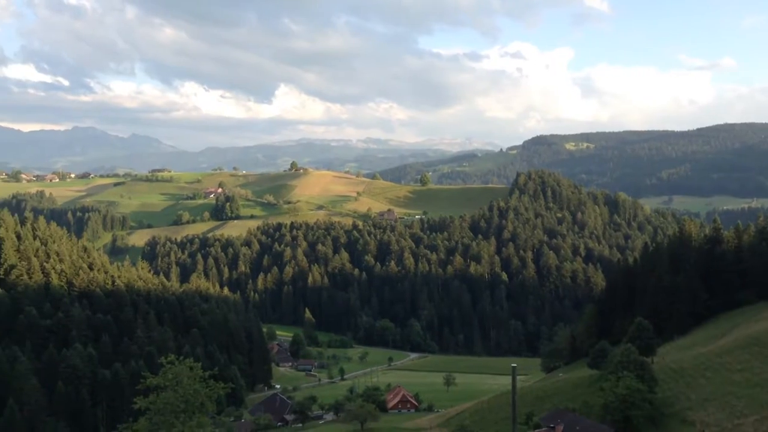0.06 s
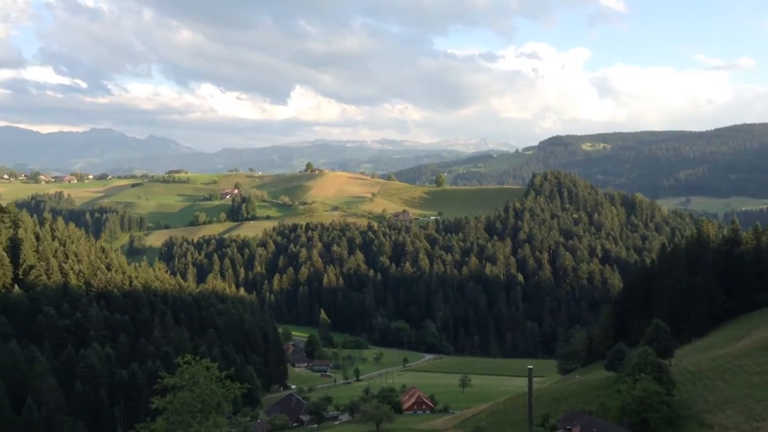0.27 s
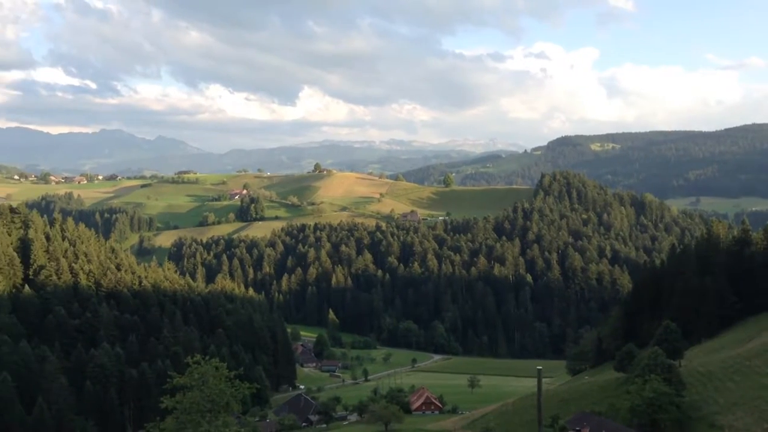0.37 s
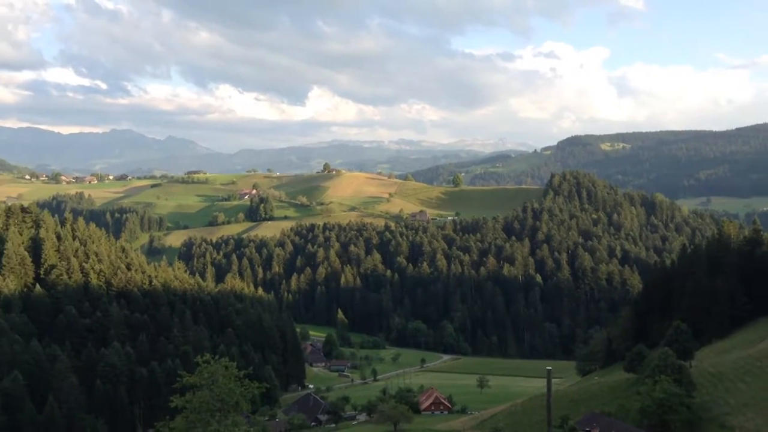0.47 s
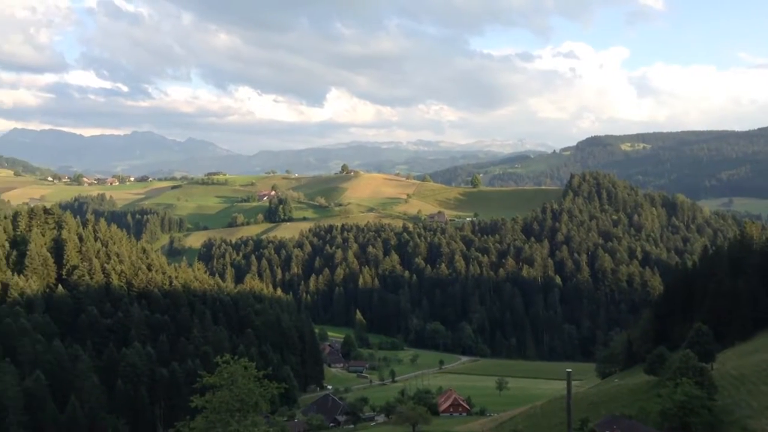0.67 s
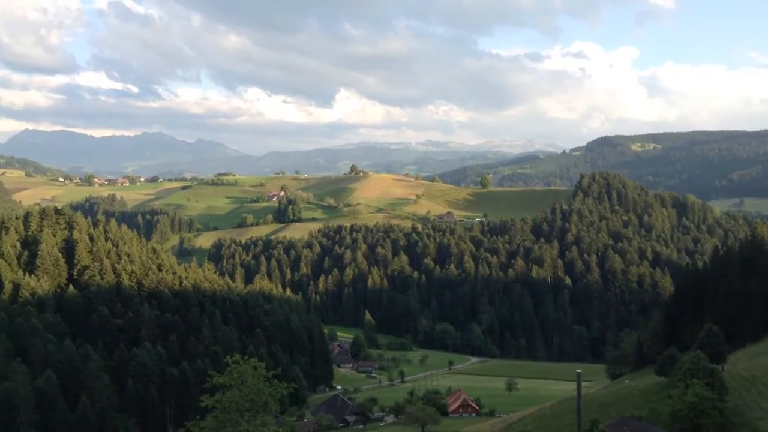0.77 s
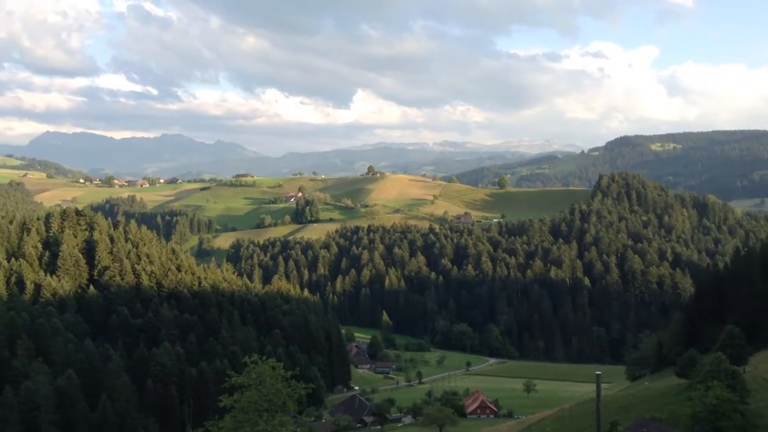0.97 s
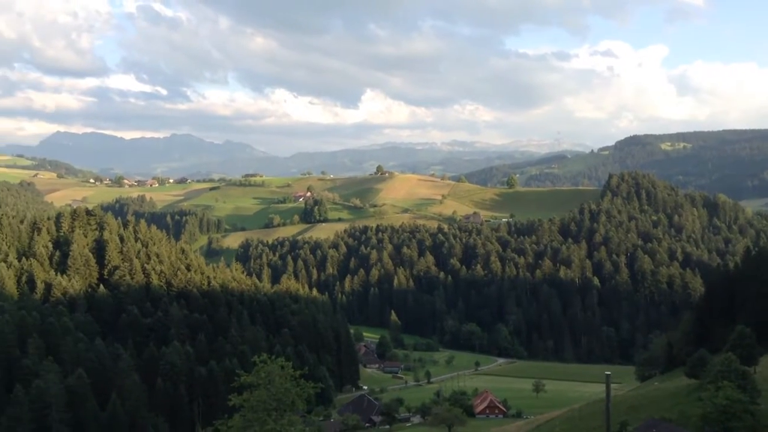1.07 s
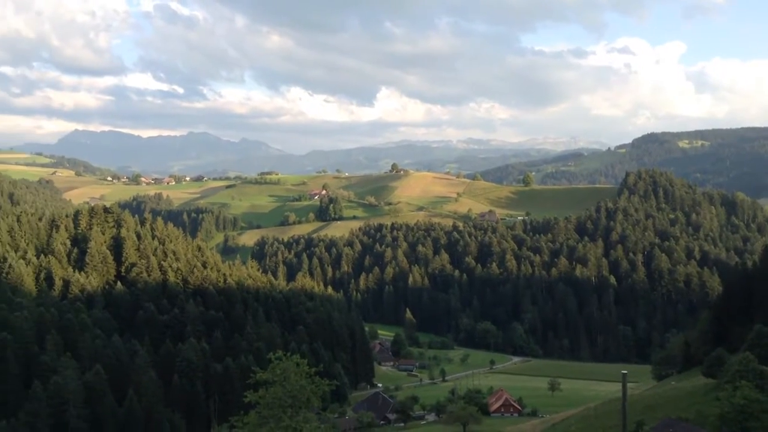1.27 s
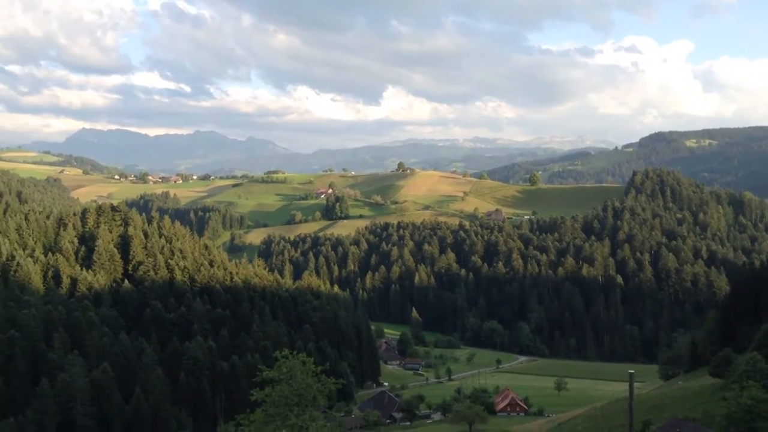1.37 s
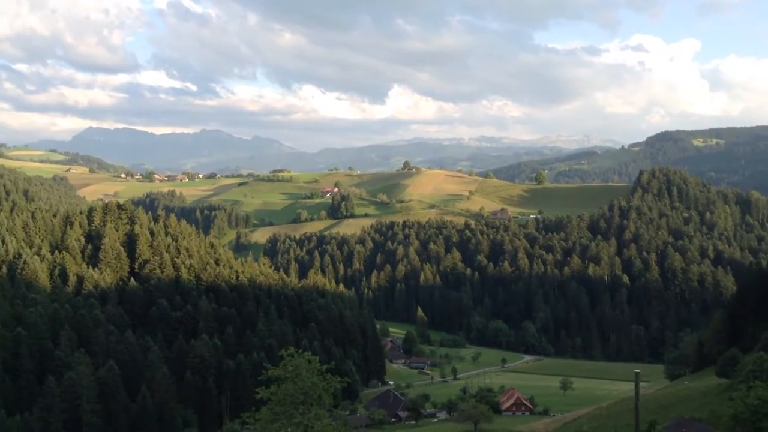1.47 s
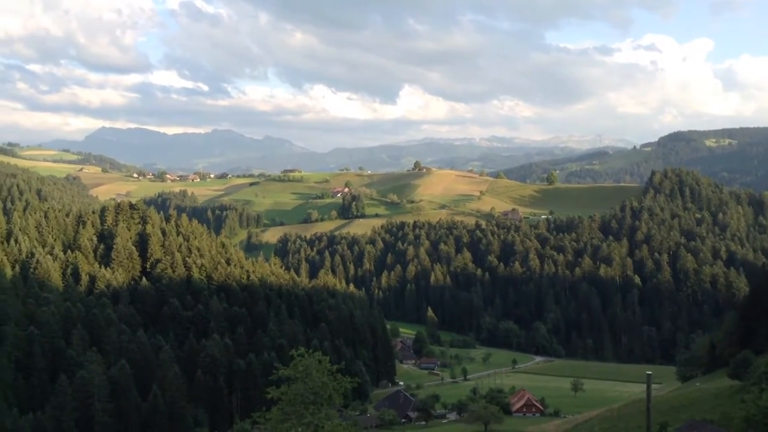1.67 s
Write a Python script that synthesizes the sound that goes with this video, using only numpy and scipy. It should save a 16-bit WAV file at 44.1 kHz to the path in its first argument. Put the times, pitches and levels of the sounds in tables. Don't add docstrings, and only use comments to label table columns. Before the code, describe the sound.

A cow grunts softly at 0.13 s, then lows from 0.23 to 1.2 s: a rough start, rising in pitch, loudest near 0.63, easing, then cracking at 1.14, with faint hillside echo. A small nearby bell clinks at 0.19, 0.55, 0.75 and hardest at 0.92; a farther bell at 1.22. Crickets and faint wind continue throughout; a thin bird whistle falls before 0.5; a dove coos from 1.64.

```python
import sys
import numpy as np
from scipy import signal
from scipy.io import wavfile
from scipy.ndimage import uniform_filter1d

SR = 44100
rng = np.random.default_rng(int(sys.argv[2]) if len(sys.argv) > 2 else 0)


def decibels_to_gain(level_db):
    exponent = np.asarray(level_db, float) / 20
    return 10 ** exponent


def put_to_file(sound):
    columns = np.atleast_2d(sound).T
    safe = np.clip(columns, -1, 1)
    whole_steps = np.round(safe * 32767)
    wavfile.write(sys.argv[1], SR, whole_steps.astype(np.int16))


N = 74970
BREAK_S = 1.14


def evened(x):
    return x / np.sqrt(np.mean(x ** 2) + 1e-20)


def curve(table, t, axis=1):
    rows = np.array(table, float)
    return np.interp(t, rows[:, 0], rows[:, axis])


def resonate(x, hz, width_hz):
    turn = np.exp(2j * np.pi * np.cumsum(hz * np.ones(len(x))) / SR)
    r = np.exp(-np.pi * width_hz / SR)
    return 2 * (turn * signal.lfilter([1 - r], [1, -r], x / turn)).real


def drift(size):
    return evened(uniform_filter1d(uniform_filter1d(rng.standard_normal(N), size), size))


def fade(t, start, end, edge):
    return np.clip(np.minimum(t - start, end - t) / edge, 0, 1)


def air():
    # f/Hz, level/dB per Hz
    colour = [(40, -71), (100, -19), (180, -4), (1200, -2.5), (3000, -7.5), (5300, -13), (7000, -19),
              (15000, -23)]
    level_db, patch_db = -67, 1.5
    frames, hz = N // 256 + 5, np.fft.rfftfreq(1024, 1 / SR)
    a, b, patches = rng.standard_normal((frames, 513, 3)).T
    patches = evened(uniform_filter1d(uniform_filter1d(patches, 12, 0), 12, 1))
    f, db = np.transpose(colour)
    colour_db = np.interp(np.log(hz + 1), np.log(f), db)[:, None]
    z = (a + 1j * b) * decibels_to_gain(colour_db + patch_db * patches)
    return decibels_to_gain(level_db) * evened(signal.istft(z, nperseg=1024, noverlap=768)[1][:N])


def chirps(rows):
    every_s, stroke_s, sag_hz = 0.032, 0.024, 141
    out = np.zeros(N)
    for s, length, hz, db, stray in rows:
        chance = stray * rng.standard_normal((6, 3))
        for k in range(int(length / every_s) + 1):
            i = round((s + k * every_s - stroke_s / 2) * SR)
            u = np.arange(max(i, 0), min(i + round(stroke_s * SR), N))
            x = (u - i) / SR / stroke_s
            turns = stroke_s * ((hz + 25 * chance[k, 0]) * x + sag_hz * (x - x ** 2) / 2)
            level = decibels_to_gain(db + 3.1 * chance[k, 1]) * np.sqrt(2) * np.sin(np.pi * x) ** 0.84
            out[u] += level * np.sin(2 * np.pi * turns + 30 * chance[k, 2])
    return out


def far_crickets():
    count, chorus_hz, spread_hz, chorus_db = 70, 4484, 192, -73
    haze_db, haze_width_hz = -66.5, 950
    rows = []
    for start, (stray_hz, stray_db) in zip(rng.random(count), rng.standard_normal((count, 2))):
        hz = chorus_hz + spread_hz * np.clip(stray_hz, -2, 2)
        rows.append((2.0 * start - .1, .12, hz, chorus_db + 3 * stray_db, 1))
    haze = rng.standard_normal(N)
    for _ in range(4):
        haze = resonate(haze, chorus_hz, haze_width_hz)
    return chirps(rows) + decibels_to_gain(haze_db) * evened(haze)


def near_crickets():
    # t/s, f/Hz, level/dB
    strokes = [(0.01, 4520, -63.5), (0.039, 4540, -62), (0.076, 4600, -60), (0.117, 4590, -61),
               (0.145, 4370, -68), (0.151, 4727, -63), (0.17, 4750, -69), (0.186, 4770, -62),
               (0.19, 4650, -68), (0.208, 4480, -64.6), (0.226, 4600, -64), (0.228, 4820, -62.5),
               (0.254, 4554, -60.5), (0.274, 4540, -69), (0.291, 4560, -65.7), (0.401, 4610, -62),
               (0.436, 4620, -61.9), (0.473, 4580, -61.9), (0.498, 4380, -62), (0.513, 4820, -63.5),
               (0.577, 4770, -62), (0.588, 4511, -64), (0.604, 4590, -69), (0.62, 4720, -61.5),
               (0.703, 4447, -67.5), (0.772, 4460, -65.2), (0.778, 4700, -69), (0.801, 4610, -62.6),
               (0.808, 4425, -68), (0.819, 4597, -68), (0.841, 4530, -64), (0.843, 4380, -67.0),
               (0.876, 4609, -61), (0.927, 4420, -63), (0.959, 4500, -62), (0.968, 4360, -66.5),
               (0.992, 4774, -66.5), (1.006, 4390, -62), (1.022, 4776, -64), (1.067, 4797, -67),
               (1.173, 4510, -67), (1.2, 4660, -63), (1.218, 4430, -67), (1.238, 4570, -60),
               (1.248, 4360, -76), (1.276, 4640, -62), (1.276, 4468, -65.3), (1.316, 4600, -62.5),
               (1.442, 4750, -66.6), (1.484, 4780, -66.4), (1.53, 4580, -63), (1.565, 4650, -59.5),
               (1.6, 4576, -59.5), (1.612, 4380, -61), (1.618, 4791, -63), (1.632, 4350, -69),
               (1.639, 4570, -63.5), (1.692, 4490, -70)]
    gain_db = 5
    return chirps([(s, 0, hz, db + gain_db, .1) for s, hz, db in strokes])


def birdcall(track, flutter_db):
    t = np.arange(N) / SR
    level = decibels_to_gain(curve(track, t, axis=2) + flutter_db * drift(200))
    level = level * fade(t, track[0][0], track[-1][0] + 0.0093, 0.02)
    return np.sqrt(2) * level * np.sin(2 * np.pi * np.cumsum(curve(track, t)) / SR)


def dove():
    # t/s, f/Hz, level/dB
    coo = [
        (1.635, 490, -76),
        (1.66, 517, -78),
        (1.68, 547, -61),
        (1.7, 584, -56),
    ]
    return birdcall(coo, flutter_db=.5)


def whistle():
    # t/s, f/Hz, level/dB
    fall = [
        (.05, 8420, -95),
        (.174, 7870, -84),
        (.25, 7820, -76),
        (.32, 7720, -85),
        (.38, 7720, -76.5),
        (.48, 7650, -87),
    ]
    return birdcall(fall, flutter_db=1.5)


def bell(tones_hz, modes, blows, facing, swing_db):
    swing_hz, facing_db, clapper_s = 3.8, 5, .002
    t, out = np.arange(N) / SR, np.zeros(N)
    for k, (hz, (db, t60, side, lobes)) in enumerate(zip(tones_hz, modes)):
        power = np.zeros(N)
        for s, blow_db, at, hard, ring in blows:
            decay_db = 60 * np.maximum(t - s, 0) / (t60 * ring)
            struck = decibels_to_gain(db + blow_db + hard * np.log2(hz / 6000) - decay_db)
            power += (struck * np.cos(lobes * (at - side)) * np.clip((t - s) / clapper_s, 0, 1)) ** 2
        swing = swing_db * np.sin(2 * np.pi * (swing_hz * t + rng.random()))
        waver = decibels_to_gain(swing + facing_db * curve(facing, t) * np.cos(2 * side))
        out += np.sqrt(2 * power) * waver * np.sin(2 * np.pi * (hz * (t - blows[-1][0]) + k / 2))
    return out


def far_bell():
    tones_hz = [2304, 5444, 9222, 9658, 13910]
    # level/dB, t60/s, loudest strike side/rad, lobes round the rim
    modes = [(-70, 2.5, 0.76, 1), (-67.5, 2.45, 0.1, 1), (-82.5, 0.82, 0, 1), (-107, 0.27, 0, 1),
             (-79, 0.21, 0, 1)]
    # t/s, level/dB, side/rad, hardness/dB per octave, ring share
    blows = [
        (1.217, 0, 0.012, 0.00025, 1),
    ]
    # t/s, facing [about -1 to 1]
    facing = [(1.217, -0.26), (1.24, 0.37), (1.302, 0.67), (1.38, -1.3), (1.5, -0.41), (1.55, 0.34),
              (1.636, -0.84), (1.66, 1), (1.7, 0)]
    return bell(tones_hz, modes, blows, facing, swing_db=-1.5)


def near_bell():
    tones_hz = [3827, 3861.6, 6565, 6616, 7289, 7312, 8312, 9806, 9846, 10060, 10116, 13768]
    # level/dB, t60/s, loudest strike side/rad, lobes round the rim
    modes = [(-55.5, 3.05, 0.034, 1.03), (-57.5, 5.7, 1.74, 1.05), (-58.5, 1.15, 0.13, 1.19),
             (-68, 0.79, 2.7, 0.77), (-73.5, 0.65, .05, 1), (-62.5, 0.74, 0.7, 2), (-66, 0.39, 0.55, 2.25),
             (-82, 1.2, 0.74, 1.8), (-73, 0.27, 0.17, 2.2), (-89, 0.23, 2, 1.05), (-76.5, 0.67, 0.29, 1.25),
             (-72, .33, 0.55, 3.4)]
    # t/s, level/dB, side/rad, hardness/dB per octave, ring share
    blows = [
        (0.188, 1, 1.25, 3.5, 1.1),
        (0.551, -5.5, 0.033, 3, 1.5),
        (0.753, 1.5, 0.21, 5.5, 1.23),
        (0.921, 6, 1.105, 8, 0.7),
    ]
    # t/s, facing [-1 to 1]
    facing = [(.2, 0.65), (.58, 1), (.68, -0.67), (0.899, -.2), (1.05, 0.75), (1.2, -0.083), (1.4, -0.14),
              (1.549, 0.38), (1.7, 0.85)]
    return bell(tones_hz, modes, blows, facing, swing_db=2.5)


def grunt(t):
    start_s, length_s, tone_hz, tone_db, rasp_db = 0.132, 0.085, 196.7, -61, -61.5
    puff = np.sin(np.pi * np.clip((t - start_s) / length_s, 0, 1))
    late = np.sin(np.pi * np.clip((t - start_s - .025) / length_s, 0, 1))
    high = resonate(resonate(rng.standard_normal(N), 2140, 280), 2200, 350)
    low = resonate(resonate(rng.standard_normal(N), 1260, 700), 1200, 700)
    rasp = evened(high + 0.81 * low)
    return decibels_to_gain(tone_db) * puff * np.sin(2 * np.pi * tone_hz * t) + decibels_to_gain(rasp_db) * late * rasp


def nose_hum(t, turns):
    # t/s, first partial level/dB, second partial level/dB
    levels = [(.13, -102, -100), (.2, -72, -62), (.28, -86, -64.5), (.42, -71, -69.5), (.52, -67, -71),
              (.87, -65, -80.5), (1.13, -63.5, -69), (1.19, -91, -69), (1.26, -78.5, -87)]
    drift_db, mic_low_hz = 2.2, 115
    hum = np.zeros(N)
    for k in (1, 2):
        hum += decibels_to_gain(curve(levels, t, axis=k) + drift_db * drift(700)) * np.sin(2 * np.pi * k * turns)
    hum = signal.sosfilt(signal.butter(4, mic_low_hz, "high", fs=SR, output="sos"), hum)
    return np.sqrt(2) * hum * fade(t, levels[0][0], levels[-1][0], 0.012)


def voice_catches(t):
    # t/s, length/s, level/dB, pitch sag [share]
    catches = [(0.276, 0.011, 2.5, -0.026), (0.303, .014, -2, 0.14), (0.39, 0.012, -1, 0.075),
               (.406, 0.0067, 2, -0.011), (0.418, 0.0086, 1, 0.037), (0.454, 0.0061, -2, 0.036),
               (0.49, 0.0084, -2.5, 0.043), (0.521, 0.00744, -2.5, 0.0432), (0.571, 0.0097, -0.5, 0.021),
               (0.589, 0.0075, -2, 0.0255), (0.733, .03, 0.34, 0.006), (0.834, .011, 1, 0.051),
               (0.855, .012, -2.5, 0.0031), (0.931, 0.01, -2.5, 0.013), (0.958, 0.013, 0.5, 0.016),
               (1.001, 0.0099, 0.5, 0.031), (1.022, 0.0093, -2, -0.0058), (1.045, 0.0059, 2.5, .025),
               (1.062, 0.0076, 1.5, 0.034), (1.085, 0.013, -3.5, -0.004), (1.159, .011, -7.5, 0.14)]
    dip_db, sag = np.zeros(N), np.zeros(N)
    for s, length, db, share in catches:
        bump = np.exp(-((t - s) / length) ** 2)
        dip_db += bump * db
        sag += bump * share
    return dip_db, sag


def fold_turns(t, sag, rough):
    # t/s, f/Hz
    pitch = [
        (.24, 119.5),
        (.33, 125.3),
        (.41, 137.1),
        (.54, 146.8),
        (.63, 155.8),
        (.9, 154),
        (1.14, 151.3),
        (1.19, 134.1),
        (1.25, 119.2),
    ]
    jitter, wobble, first_pulse_s = .022, .003, .2503
    stray = jitter * rough / .6 * drift(70) + wobble * drift(600)
    turns = np.cumsum(curve(pitch, t) * (1 - sag + stray)) / SR
    return turns - turns[round(first_pulse_s * SR)]


def vocal_folds(turns, rough):
    shimmer_db, puff_share = 1.0, .5
    pulses = sum(np.cos(2 * np.pi * k * turns) for k in range(3, 50))
    pulse_number = np.floor(turns + .5).astype(int)
    size_db = shimmer_db * rng.standard_normal(400)[pulse_number] * rough / .6
    puffs = (0.11 + np.exp(-(turns % 1) / puff_share)) * rng.standard_normal(N)
    return evened(pulses) * decibels_to_gain(size_db) + rough * evened(puffs)


def throat(t, drive, rough, opening, closing, start_s):
    # f/Hz, width/Hz, level/dB, shift/Hz while the jaw still opens
    resonances = [(797.4, 53.6, 2, 7.7), (1528, 520, -11, 215), (1941, 147, 0.5, 11), (2577, 168, -1.5, 93),
                  (3276, 223, -14, 110), (3940, 910, -24.5, 10)]
    closing_db = [2.8, 1.5, -4.5, -2, 2, -2]
    first_db = [-2, 6, 3, 3, 1, 6.5]
    first_hz = [-67, -9, -34, 15, -1, 7]
    jaw_hz = [-33, -100, -300, 34, -3, 0]
    break_db = [-5, 3, 0, 4.5, 3, 0]
    # f/Hz, width/Hz, level/dB
    buzz = [(5210, 280, -17), (6040, 230, -30.5)]
    tremble_share, tremble_db, swell_db, swell_hz = .018, 1.6, 1, 18
    first = np.clip((0.338 - t) / 0.11, 0, 1)
    jaw = np.exp(-np.maximum(t - start_s, 0) / 0.028)
    swell = fade(t, 0.36, 0.63, 0.0056)
    broken = fade(t, BREAK_S, 2, 0.018)
    tremble = np.maximum(rough, 0) ** .5
    out = np.zeros(N)
    for k, (hz, width, db, shift_hz) in enumerate(resonances):
        level_db = db + closing_db[k] * closing + first_db[k] * first + break_db[k] * broken
        place_hz = hz + shift_hz * opening + first_hz[k] * first + jaw_hz[k] * jaw
        if k == 0:
            level_db = level_db + swell_db * swell
            place_hz = place_hz + swell_hz * swell
        else:
            level_db = level_db + tremble_db * tremble * drift(260)
            place_hz = place_hz + hz * tremble_share * tremble * drift(260)
        out += (-1) ** k * decibels_to_gain(level_db) * resonate(drive, place_hz, width)
    out = signal.sosfilt(signal.butter(6, 4700, fs=SR, output="sos"), out)
    for hz, width, db in buzz:
        out = out + opening * decibels_to_gain(db) * resonate(resonate(drive, hz, width), hz, width)
    return signal.sosfilt(signal.butter(6, 540, "high", fs=SR, output="sos"), out)


def cow():
    # t/s, level/dB
    effort = [
        (.232, -62),
        (.252, -49),
        (.33, -42.5),
        (.41, -40.5),
        (.63, -38),
        (.9, -41.5),
        (1.14, -45),
        (1.172, -51),
        (1.198, -69),
    ]
    t = np.arange(N) / SR
    dip_db, sag = voice_catches(t)
    opening = np.clip((.62 - t) / 0.38, 0, 1)
    closing = np.clip((t - 0.71) / 0.53, 0, 1)
    rough_start, rough_held, rough_tired, rough_break = .6, .09, .14, .3
    rough = rough_held + (rough_start - rough_held) * opening + rough_tired * closing
    rough = rough + rough_break * (t > BREAK_S) - 0.074 * dip_db
    turns = fold_turns(t, sag, rough)
    start_s, end_s = effort[0][0], effort[-1][0]
    voice = evened(throat(t, vocal_folds(turns, rough), rough, opening, closing, start_s))
    voice = voice * decibels_to_gain(curve(effort, t) + dip_db) * fade(t, start_s, end_s, 0.0034)
    return voice + nose_hum(t, turns) + grunt(t)


def slope(x):
    level_db, t60_s, delay_s = -17, .35, .03
    t = np.arange(SR // 2) / SR
    tail = rng.standard_normal(len(t)) * decibels_to_gain(-60 * t / t60_s) * (t > delay_s)
    return decibels_to_gain(level_db) * signal.fftconvolve(x, tail / np.linalg.norm(tail))[:N]


def scene():
    background = air() + far_crickets() + near_crickets() + dove() + whistle()
    bells = far_bell() + near_bell()
    moo = cow()
    return (background + bells + moo + slope(moo))[None]


def top_cut(x):
    return signal.sosfilt(signal.butter(12, 15390, fs=SR, output="sos"), x)


def record(dry):
    mask_from_hz, mask_db = 5000, -14.5
    hz, _, z = signal.stft(dry[0], SR, nperseg=1024)
    power = uniform_filter1d(abs(z) ** 2, size=3, axis=1)
    near = uniform_filter1d(power, size=5, axis=0)
    spread = uniform_filter1d(power, size=36, axis=0, origin=8)
    keep = (near > spread * decibels_to_gain(2 * mask_db)) | (hz[:, None] < mask_from_hz)
    kept = signal.istft(z * keep, SR, nperseg=1024)[1][None, :N]
    return top_cut(kept)


dry = scene()
out = record(dry)
put_to_file(out)
```